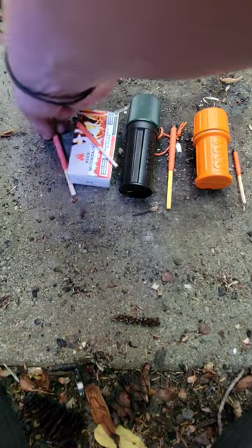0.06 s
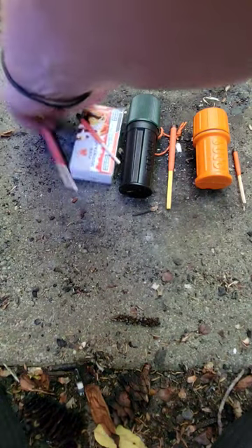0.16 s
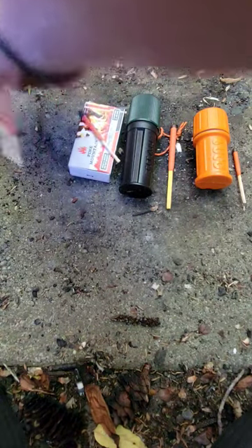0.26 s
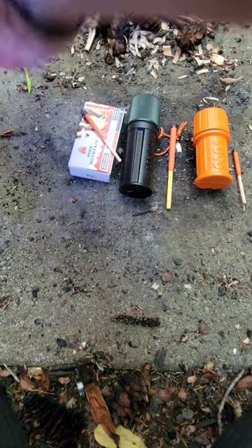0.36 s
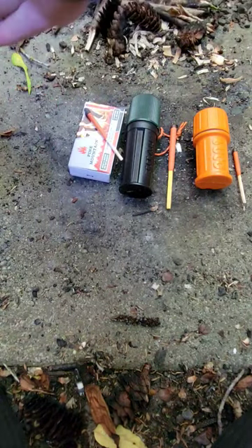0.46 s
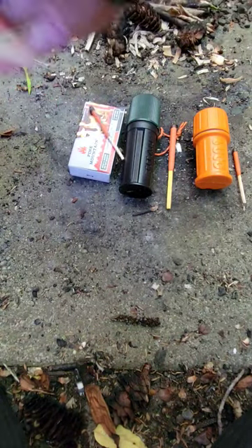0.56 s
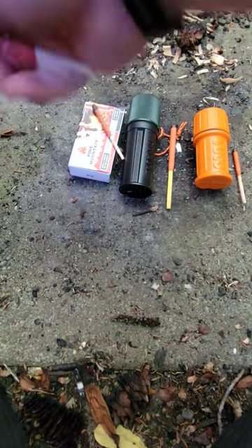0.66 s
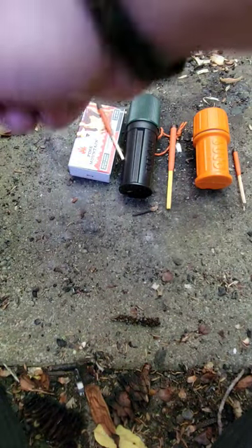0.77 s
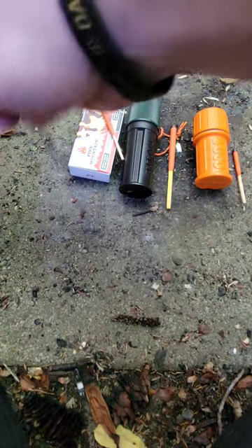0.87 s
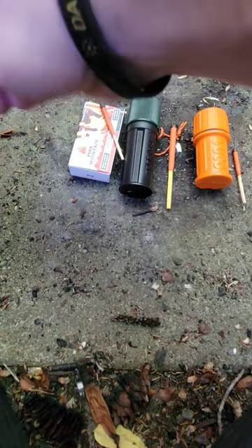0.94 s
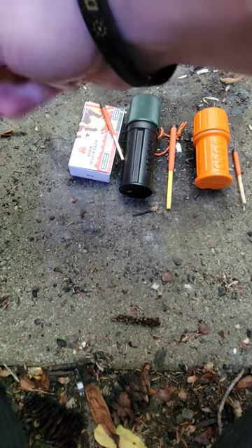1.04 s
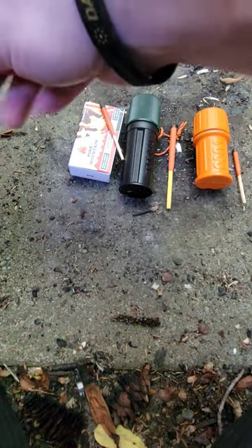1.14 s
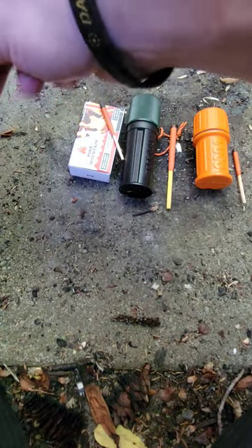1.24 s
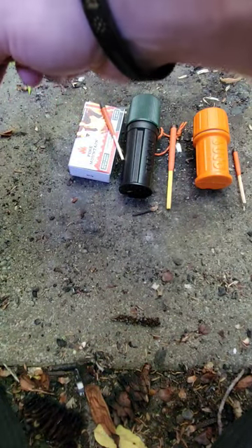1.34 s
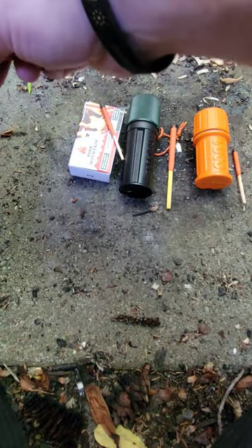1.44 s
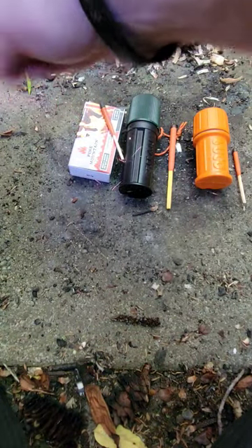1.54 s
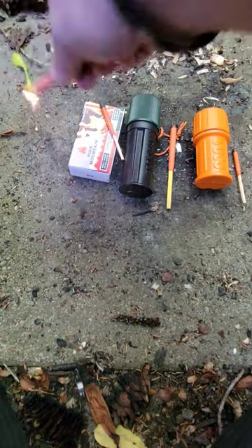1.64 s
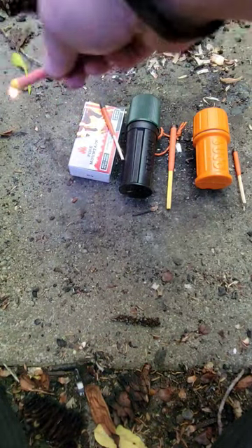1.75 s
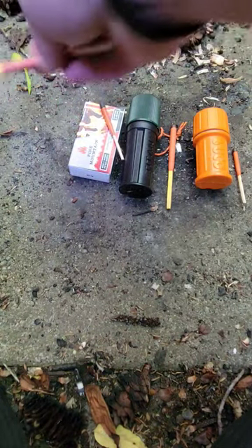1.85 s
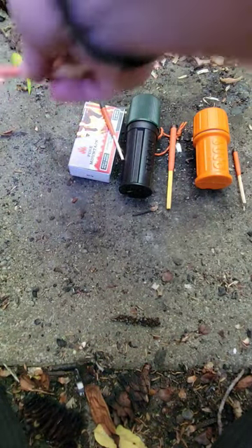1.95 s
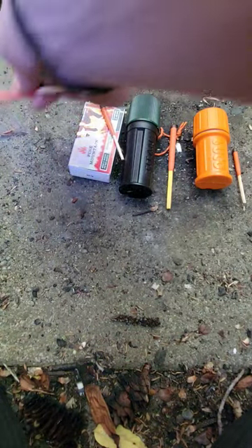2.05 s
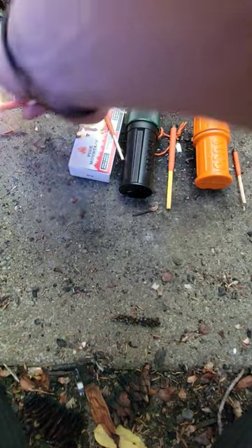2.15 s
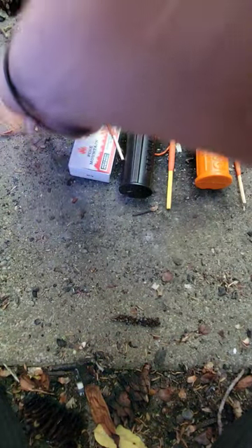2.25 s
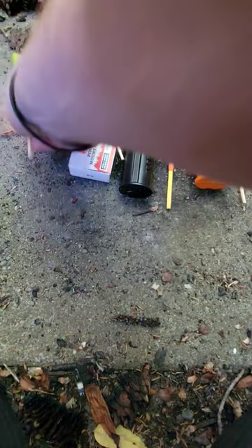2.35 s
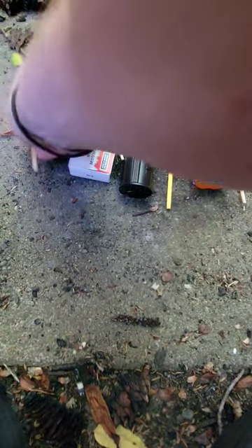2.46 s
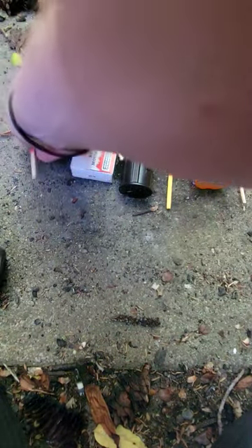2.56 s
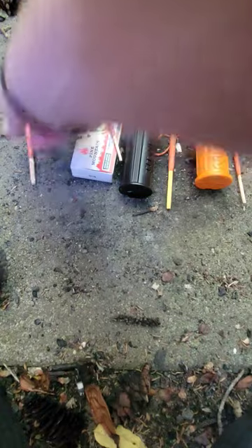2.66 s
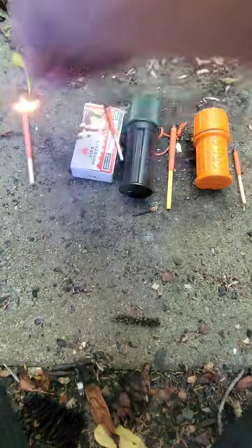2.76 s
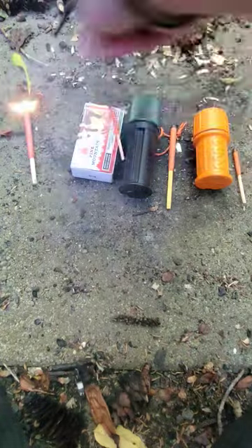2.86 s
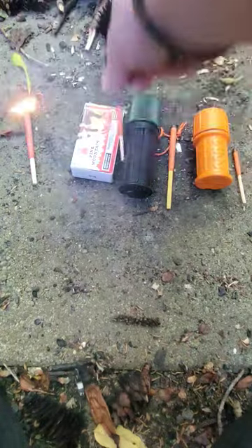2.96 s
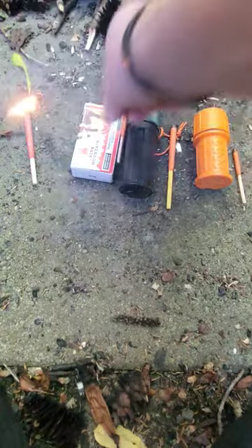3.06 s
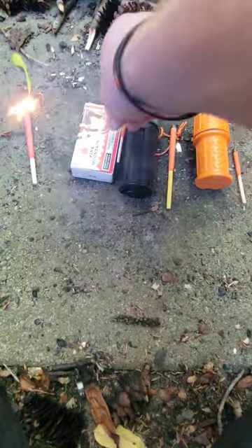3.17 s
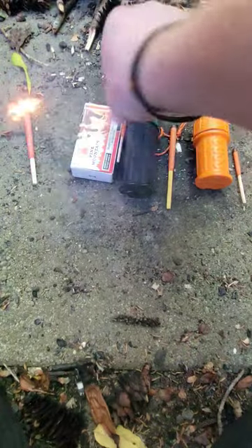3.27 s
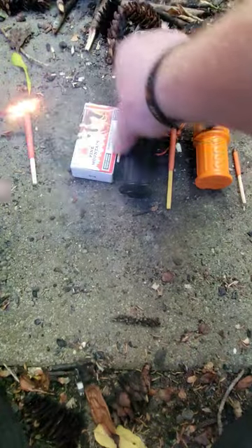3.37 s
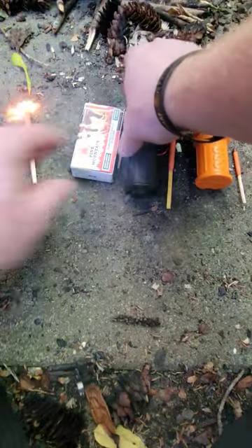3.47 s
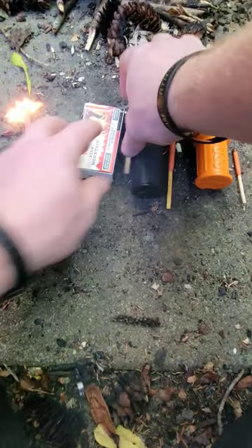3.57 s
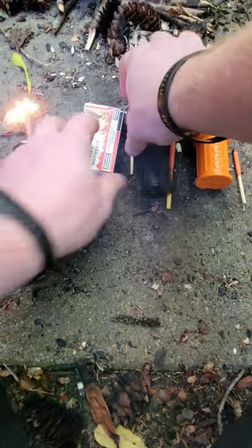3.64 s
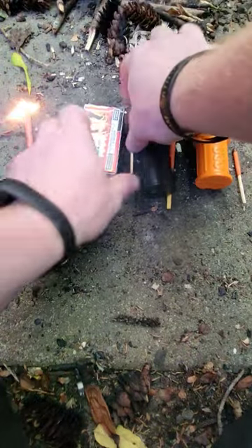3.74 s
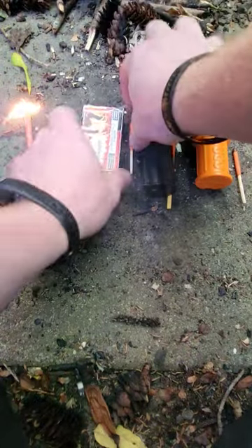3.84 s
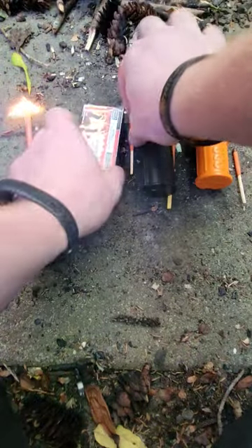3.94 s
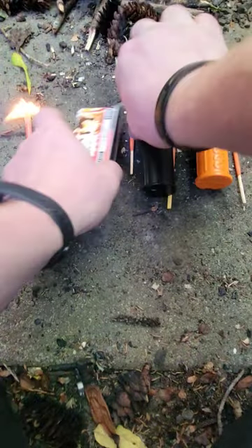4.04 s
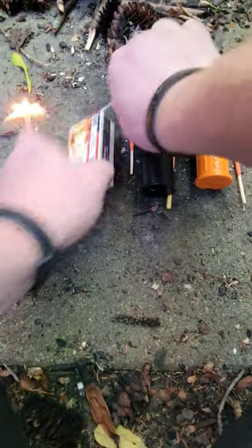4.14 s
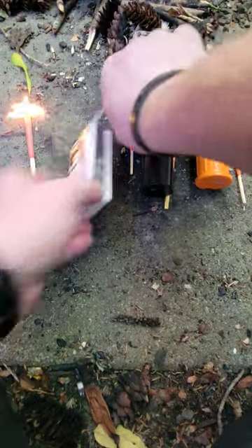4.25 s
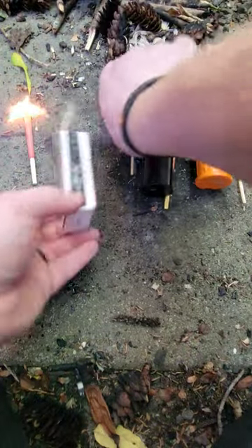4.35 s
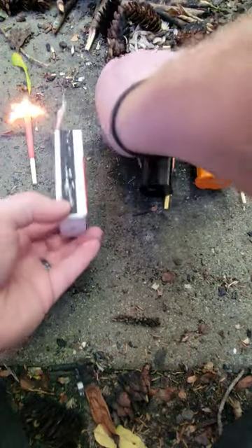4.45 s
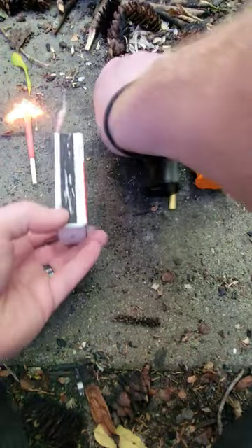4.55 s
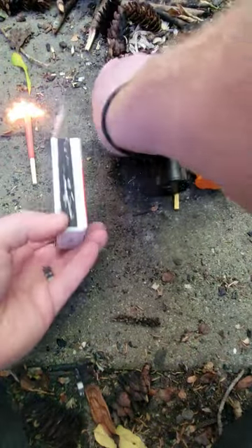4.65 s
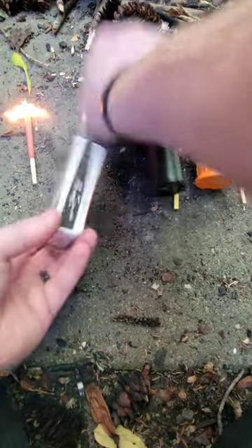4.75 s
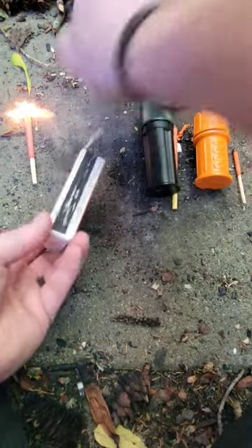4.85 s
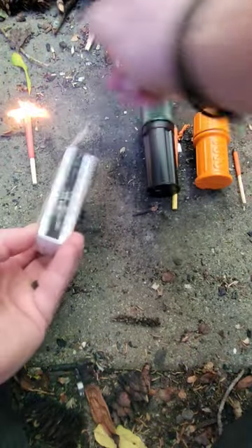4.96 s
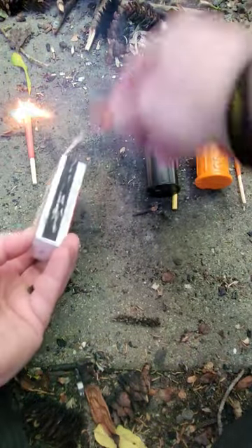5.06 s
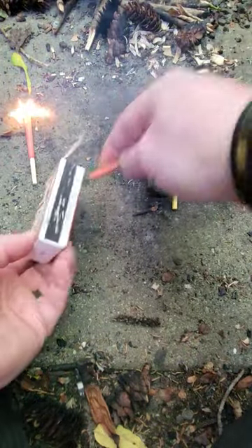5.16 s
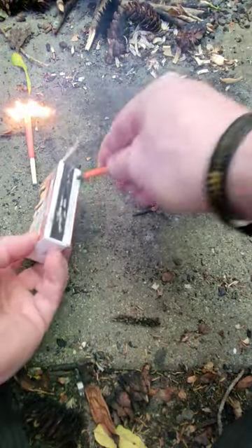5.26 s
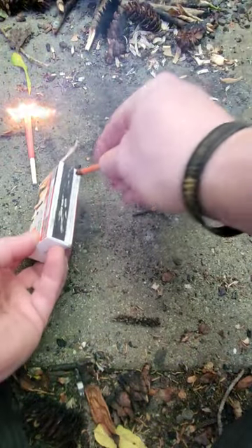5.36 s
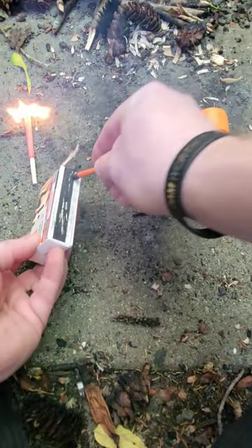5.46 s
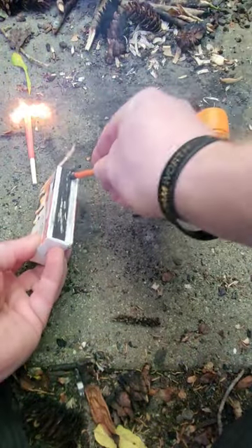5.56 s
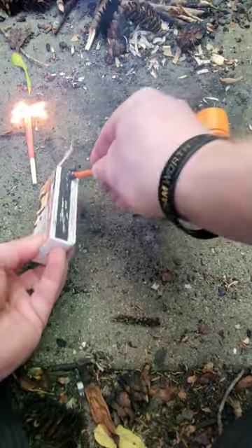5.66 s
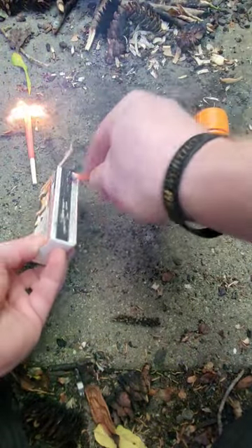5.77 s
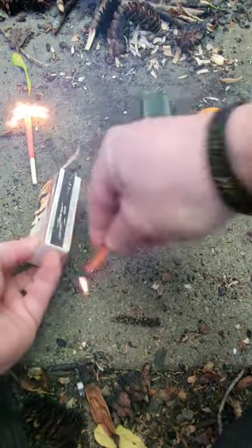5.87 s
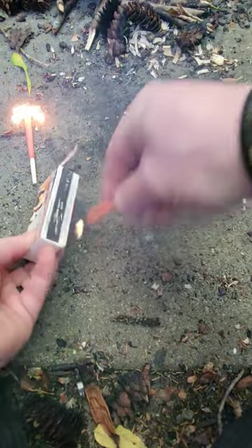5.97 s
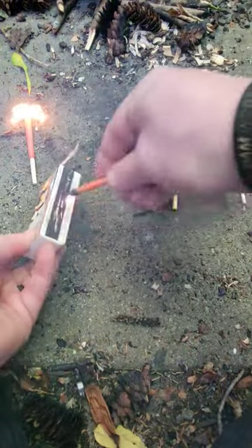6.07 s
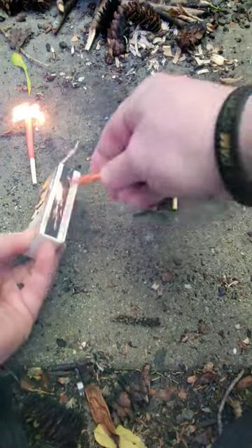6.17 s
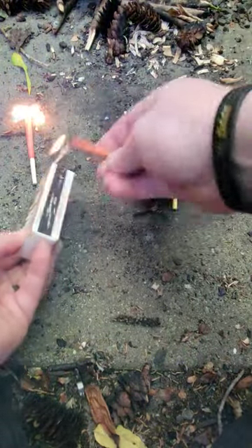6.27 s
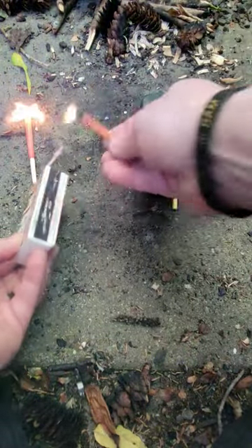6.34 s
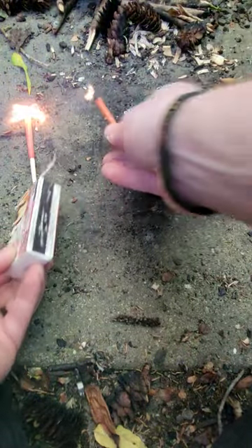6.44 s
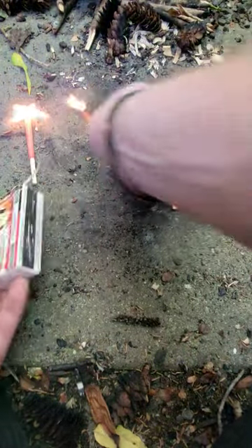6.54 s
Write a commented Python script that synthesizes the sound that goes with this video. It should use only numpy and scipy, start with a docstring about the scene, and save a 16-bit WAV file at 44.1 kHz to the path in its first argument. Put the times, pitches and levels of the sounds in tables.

```python
"""Over faint outdoor noise, hands knock and rub a cardboard box, match sticks and a plastic match tube.
A storm match then rasps on the strip in bites of snapping grains, catches, and hisses on as gas-jet noise,
its ground echo sweeping up as it is lowered to the concrete. More handling follows: gritty contacts through
resonances. A second match is scraped near the end and catches with a short rush. A two-port microphone
hears all with one port balance; close strikes and more scattered sounds differ in phase and likeness."""
import sys
import numpy as np
from scipy import signal
from scipy.fft import rfft, irfft
from scipy.io import wavfile
from scipy.ndimage import uniform_filter1d, map_coordinates

SR = 44100
rng = np.random.default_rng(int(sys.argv[2]) if len(sys.argv) > 2 else 0)


def to_wav(s):
    """Save 16-bit WAV."""
    ch = np.atleast_2d(s).T  # columns
    pcm = np.round(np.clip(ch, -1, 1) * 32767)  # PCM
    wavfile.write(sys.argv[1], SR, pcm.astype(np.int16))


N = 291360
TIME = np.arange(N) / SR
HZ = np.fft.rfftfreq(N, 1 / SR)

BITE_RISE_S, BITE_FALL_S = 0.00092, 0.0018
DRAG_RISE_S, DRAG_FALL_S = 0.0065, 0.006


def strike(bites, drag, spectrum, db, share):
    """The head drags over the strip and tears at it in bites, each a dense burst of snapping grains."""
    start_s, drag_db, stroke_s = drag
    pushes = [(s, level, BITE_RISE_S, length, BITE_FALL_S) for s, level, length in bites]
    pushes.append((start_s, drag_db, DRAG_RISE_S, stroke_s, DRAG_FALL_S))
    snaps = grains(per_s=10000, spread_db=5.0, share=share)
    return amp(db) * shaped(pressure(pushes) * snaps, spectrum)


# Head biting the strip. Each row: start in seconds, level in relative dB, length in seconds.
FIRST_BITES = [(1.6318, -15, 0.0089), (1.6447, -14.5, 0.0057), (1.6525, -13.5, 0.0023)]
SECOND_BITES = [(5.8643, -13, 0.0014), (5.8903, -22.5, 0.0089), (5.8956, -12.5, 0.00054)]
# Light drag along the strip. Each: start in seconds, level in relative dB, length in seconds.
FIRST_DRAG, SECOND_DRAG = (1.630, -26, 0.019), (5.860, -39.5, 0.044)
# Rasp colour. Each row: frequency in Hz, level in relative dB.
FIRST_RASP_COLOUR = [(30, -15), (120, -20.5), (200, 1), (300, -3.5), (420, -8), (800, -5), (1150, -1),
                     (1500, -1.5), (2100, -0.5), (3200, -5.5), (4600, -7.5), (7500, -8.5), (9500, -17),
                     (15000, -13.5)]
SECOND_RASP_COLOUR = [(40, -19), (150, -9), (330, -11.5), (480, -11), (700, -6.5), (1050, 2), (1450, -14.5),
                      (1900, -7.5), (2900, -6.5), (4000, -14), (5400, -3), (7300, -13), (9200, -18),
                      (12500, -11), (15000, -11.5)]


def strikes():
    """Both heads scraped over the strip, each with its catching rush."""
    grain_share = .55
    first = strike(FIRST_BITES, FIRST_DRAG, FIRST_RASP_COLOUR, db=0.5, share=grain_share)
    second = strike(SECOND_BITES, SECOND_DRAG, SECOND_RASP_COLOUR, db=3.0, share=grain_share)
    return first + second + catches()


# Heads catching. Each row: start in seconds, level in dB.
CATCH_TIMES = [(1.657, -30.5), (5.902, -32)]
CATCH_RISE_S, CATCH_HOLD_S, CATCH_FALL_S = 0.0024, 0.0069, 0.0095
# Rush colour. Each row: frequency in Hz, level in relative dB.
CATCH_COLOUR = [(60, -9), (200, 3.5), (600, -3), (1100, -2), (1700, -12.5), (2700, -4), (4500, -13),
                (7500, -7), (10000, -15), (15000, -16)]


def catches():
    """Each head catches fire with a crackling rush that dies quickly."""
    rush = pressure([(s, db, CATCH_RISE_S, CATCH_HOLD_S, CATCH_FALL_S) for s, db in CATCH_TIMES])
    return shaped(rush * grains(per_s=4000, spread_db=2.0, share=0.8), CATCH_COLOUR)


# Gas pushed out by a catching head.
# Each row: start in seconds, level in relative dB, swing rate in Hz, time to the crest in seconds.
GAS_PUFFS = [(1.639, -24.5, 62, 0.0092), (1.637, -26.5, 178, 0.008), (1.656, -25, 140, 0.0018)]


def puffs():
    """The sudden gas gives a few low swings of pressure."""
    out = np.zeros(N)
    for s, db, hz, crest_s in GAS_PUFFS:
        t = np.maximum(TIME - s, 0)
        age = np.minimum(t / crest_s, 30)
        swell = age * np.exp(1 - age)
        out += amp(db) * np.sin(2 * np.pi * hz * t) * swell
    return signal.sosfilt(signal.butter(1, 40, "high", fs=SR, output="sos"), out)


# Hiss of the fresh flare and of the even burn. Each row: frequency in Hz, level in relative dB.
FLARE_COLOUR = [(300, -8), (1000, -12), (1800, -1), (2800, -0.5), (4500, -1), (7500, -1.5), (9500, -6),
                (13000, -4), (15500, -5)]
BURN_COLOUR = [(150, -5), (450, -5), (750, 0), (1250, -9), (1550, -9.5), (3200, -10), (5400, -15),
               (7700, -16), (9500, -23.5), (13500, -18), (15500, -19)]
# Lulls in the hiss. Each row: centre in seconds, depth in dB, half width in seconds.
HISS_LULLS = [(2.35, 3.5, 0.14), (3.2, 6.5, 0.29), (3.85, 2, 0.22), (5.78, 2, .08)]
LIT_S, FLARE_RISE_S, SPENT_S, FLARE_FALL_S = 1.64, 0.078, 3.04, .06
FLARE_FADE_DB_PER_S, FIZZ_FADE_DB_PER_S = 10, 3.5  # the fizz fade adds to the flare fade
BURN_FROM_S, BURN_RISE_S = 1.87, 1  # the coated stick takes over


def flame(flare_db=-46, burn_db=-53.0, fizz_db=1.0, treble_lull=0.088):
    """Hissing gas jets: a bright flare that fades, then an even burn; in a lull the treble drops most."""
    age_s = np.maximum(TIME - LIT_S, 0)
    jets = grains(per_s=1800, spread_db=4, share=.5)
    lull_db = sum(depth * np.exp(-((TIME - s) / width) ** 2) for s, depth, width in HISS_LULLS)
    spent = np.exp(-np.maximum(TIME - SPENT_S, 0) / FLARE_FALL_S)
    alight = np.minimum(age_s / FLARE_RISE_S, 1) * spent
    flare_hiss = treble(shaped(jets, FLARE_COLOUR), fizz_db - FIZZ_FADE_DB_PER_S * age_s)
    flare = alight * amp(flare_db - FLARE_FADE_DB_PER_S * age_s) * flare_hiss
    burn_rise = np.clip((TIME - BURN_FROM_S) / BURN_RISE_S, 0, 1)
    burn = burn_rise * amp(burn_db) * shaped(jets, BURN_COLOUR)
    return ground_echo(amp(-lull_db) * treble(flare + burn, -treble_lull * lull_db))


def treble(x, db):
    """Raises or lowers the fizz above 8 kHz."""
    fizz = irfft(rfft(x) * np.clip((HZ - 8000) / 1000, 0, 1), N)
    return x + (amp(db) - 1) * fizz


START_HEIGHT_M, REST_HEIGHT_M, LOWER_S = .058, .01, .93
ECHO_GAIN, ECHO_FADE_S = .31, .35


def ground_echo(gas):
    """The echo off the concrete sweeps upward as the match is lowered, slowly at first, and fades out."""
    age_s = np.maximum(TIME - LIT_S, 0)
    height_m = np.maximum(START_HEIGHT_M * (1 - (age_s / LOWER_S) ** 2), REST_HEIGHT_M)
    echo = ECHO_GAIN * np.clip((LOWER_S - age_s) / ECHO_FADE_S, 0, 1)
    delay_s = 2 * height_m / 343  # there and back at the speed of sound in m/s
    return gas + echo * map_coordinates(gas, [(TIME - delay_s) * SR], order=3)


def sputter(pair, flutter_db=1.4, patch_db=2.5):
    """The flame flutters as a whole, while single jets come and go in patches of pitch."""
    z = signal.stft(pair, nperseg=512)[2]
    patches = rng.standard_normal(z.shape[1:])
    patches = uniform_filter1d(patches, size=5, axis=0)  # across pitch
    patches = evened(uniform_filter1d(patches, size=10, axis=1))  # along time
    patchy = signal.istft(z * amp(patch_db * patches), nperseg=512)[1][:, :N]
    return patchy * amp(flutter_db * drift(per_s=38))


# Match sticks and plastic tube, cardboard box, then grit and sparks.
# Each row: start in seconds, level in relative dB, lowest resonance in Hz.
STICK_HITS = [(0.2375, -34.5, 2530), (0.2515, -28.5, 2026), (0.5648, -32.5, 2460), (0.577, -36.5, 2480),
              (0.839, -44, 2000), (2.5704, -25, 2555), (3.0972, -26, 2470), (3.1125, -31, 2500),
              (3.1248, -21.5, 2440), (3.1528, -30, 2700), (3.163, -34, 2460), (5.6265, -39.5, 2600)]
BOX_HITS = [(0.103, -37.5, 1160), (0.2375, -45, 1400), (0.268, -39.5, 1270), (0.839, -37.5, 1580),
            (1.194, -43.5, 1460), (3.617, -45, 1310), (4.186, -38.5, 1230), (5.265, -48, 1100),
            (5.514, -44, 1070), (5.535, -46.5, 1130), (5.6265, -38.5, 1100)]
GRIT_HITS = [(0.0418, -53.5, 7960), (0.8546, -48, 2770), (0.9612, -45.5, 2580), (1.0054, -43, 3510),
             (2.6805, -39, 7800), (2.74, -50, 4550), (2.9584, -37.5, 3000), (3.053, -35.5, 5570),
             (3.0975, -26.5, 2600), (3.6173, -41.5, 4020), (3.684, -46, 2720), (4.558, -42, 4400),
             (4.614, -47, 4650), (4.6683, -45.5, 4600), (6.0172, -45, 2380)]
# Resonances of each. Each row: frequency in Hz before the shift, width in Hz, level in relative dB.
STICK_RESONANCES = [(2500, 130, 1), (3010, 240, -8), (4900, 180, -7), (5360, 170, -5), (6550, 200, -10),
                    (7400, 160, -9)]
BOX_RESONANCES = [(1240, 280, 6.5), (1750, 150, -19), (2250, 140, -22), (2990, 170, -31), (4530, 200, -15)]
GRIT_RESONANCES = [(5040, 170, 4), (7600, 1700, -11)]


def hands():
    """All the small handling sounds: rubs, and knocks of sticks, box and grit."""
    sticks = knocks(STICK_HITS, STICK_RESONANCES, db=0.0, contact_db=-15.5, decay_s=0.0028, bright_db=-2.5)
    box = knocks(BOX_HITS, BOX_RESONANCES, db=7.5, contact_db=-13.5, decay_s=0.0025, bright_db=-1.4)
    ticks = knocks(GRIT_HITS, GRIT_RESONANCES, db=2.0, contact_db=-10.5, decay_s=0.0028, bright_db=5.0)
    return rubs(db=4.0) + sticks + box + ticks


# Dry contact noise. Each row: frequency in Hz, level in relative dB.
CONTACT_COLOUR = [(100, -42), (600, -21), (1200, -5), (1700, -3), (7000, -6), (9500, -12), (15000, -15.5)]
# Harder is brighter: dB an octave for each dB of row level above the middling one.
BRIGHTEN, MIDDLING_DB = 0.11, -34.5


def knocks(rows, modes, db, contact_db, decay_s, bright_db, rise_s=.0008, blow=1.8):
    """Each knock is a brief gritty contact; where it lands shifts the resonances of the thing touched."""
    out, t = np.zeros(N), np.arange(4096) / SR
    rattle = .07 * np.exp(-t / .016)
    envelope = (np.exp(-t / max(decay_s, .0004)) + rattle) * np.minimum(t / rise_s, 1)
    for (s, level_db, ring_hz), grit in zip(rows, rng.standard_normal((len(rows), len(t)))):
        tilt_db = bright_db + BRIGHTEN * (level_db - MIDDLING_DB)  # per octave
        shift = ring_hz / modes[0][0]

        def body(hz):
            """Gain of the touched thing: resonances plus dry contact, tilted by hardness."""
            ring = sum(amp(level) ** 2 / (1 + (2 * (hz - f * shift) / width) ** 2)
                       for f, width, level in modes)
            contact = amp(contact_db + read(CONTACT_COLOUR, hz)) ** 2
            bare = np.sqrt(ring + contact) * hz / (hz + 400)
            return bare * amp(tilt_db * np.log2(np.maximum(hz, 500) / 3000))

        push = grit * envelope
        push[round(rise_s * SR)] += blow  # the clean impact inside the grit
        part = out[round(s * SR):][:len(t)]
        part += amp(level_db + db) * colour(push, body)[:len(part)]
    return out


# Fingers and sticks sliding. Each row: start in seconds, level in relative dB, length in seconds.
RUB_STROKES = [(0.082, -57.5, 0.024), (0.183, -61.5, 0.053), (.255, -54.5, 0.031), (.39, -65.5, .05),
               (0.65, -61.5, 0.11), (.92, -69, 0.35), (1.007, -53, 0.015), (2.585, -52, 0.015),
               (2.893, -55, 0.08), (3.02, -56, 0.086), (3.495, -56.5, 0.09), (4.58, -59.5, .08),
               (4.846, -55.5, 0.039), (5.021, -50.5, 0.032)]
# Slide colour. Each row: frequency in Hz, level in relative dB.
SLIDE_COLOUR = [(200, -36), (900, 6), (1600, -2), (2900, 3.5), (4200, -1.5), (7500, -1.5), (9500, -9.5),
                (14000, -4.5)]
RUB_RISE, RUB_FALL = 0.26, 0.4  # time constants as shares of the length


def rubs(db):
    """Skin and wood dragging over card, plastic and concrete."""
    pushes = [(s, level, RUB_RISE * length, length, RUB_FALL * length) for s, level, length in RUB_STROKES]
    friction = pressure(pushes) * grains(per_s=2000, spread_db=4.5, share=0.74)
    return amp(db) * shaped(friction, SLIDE_COLOUR)


def bump(start_s=.438, db=-47.5, hz=480, decay_s=0.0096):
    """One soft, dull bump of the hand."""
    thud = pressure([(start_s, db, .002, .003, decay_s)]) * rng.standard_normal(N)
    return colour(thud, lambda f: 1 / (1 + ((f - hz) / 220) ** 2))


def clutter(pair, db, spread_s=.005, count=7):
    """A few hard reflections from the box, tubes and hands, different at each port."""
    size = 1024
    at = ((0.083 + rng.random((2, count))) * spread_s * SR).astype(int)
    at = np.clip(at, 1, size - 1)
    taps = np.zeros((2, size))
    np.put_along_axis(taps, at, amp(db) / np.sqrt(count) * rng.choice([-1, 1], at.shape), 1)
    # small things reflect only the short waves
    taps = signal.sosfilt(signal.butter(1, 700, "high", fs=SR, output="sos"), taps)
    return pair + signal.oaconvolve(pair, taps, axes=1)[:, :N]


def yard(x, db=-21, t60_s=0.12, dull_hz=4200):
    """A faint, dull return from the surroundings."""
    t = np.arange(SR // 2) / SR
    onset = np.clip((t - .006) / 0.0065, 0, 1)
    taps = rng.standard_normal((2, len(t))) * amp(-60 * t / t60_s) * onset
    band = signal.butter(2, [300, min(dull_hz, SR / 3)], "band", fs=SR, output="sos")
    taps = signal.sosfilt(band, taps)
    return amp(db) * signal.oaconvolve(x[None], taps / np.linalg.norm(taps[0]), axes=1)[:, :N]


# Outdoor noise. Each row: frequency in Hz, level in relative dB.
AIR_COLOUR = [(20, -19), (40, -2.5), (60, 3), (100, -1), (150, -8.5), (300, -13), (470, -17), (750, -17.5),
              (1050, -17), (1500, -21.5), (3000, -29), (7500, -37), (9500, -47), (15000, -47)]
# Distant rumble, used relative to its mean. Each row: time in seconds, level in dB.
RUMBLE_SWELL = [(0, -50.5), (1.55, -49), (2.1, -53.5), (4.1, -53.5), (5.3, -50), (6.6, -50)]
AIR_RMS_DB = -49


def air():
    """Distant outdoor noise; its rumble swells slowly and is nearly alike at both ports."""
    noise = rfft(rng.standard_normal((2, N))) * amp(read(AIR_COLOUR, HZ)) * HZ / (HZ + 10)
    bass = 1 / (1 + (HZ / 160) ** 4)
    swell_s, level_db = np.transpose(RUMBLE_SWELL)
    swell_db = np.interp(TIME, swell_s, level_db)
    rumble = irfft(noise * bass, N) * amp(swell_db - swell_db.mean())
    a, b = irfft(noise * (1 - bass), N) + rumble
    return amp(AIR_RMS_DB) * evened(ports(a, b, SCATTERED_LIKENESS, GROUND_PHASE, lead_s=0.00034))


# Port balance. Each row: frequency in Hz, left minus right in dB.
BALANCE = [(60, -0.8), (200, -4), (380, -6.5), (620, 5), (1050, -1.5), (1500, 0.5), (2200, -1.5),
           (4000, -1), (7000, 0.5), (15000, 2.5)]


def ports(x, other, likeness, leads, lead_s):
    """Two ports differ in phase and level; the less alike, the more the right hears of other paths."""
    beyond_hz = np.maximum(HZ - leads[-1][0], 0)
    phase = read(leads, HZ) + 2 * np.pi * lead_s * beyond_hz
    lean = amp(read(BALANCE, HZ) / 2)
    turn = lean * np.exp(.5j * phase)
    same = np.clip(read(likeness, HZ), 0, 1)
    left = rfft(x)
    right = same * left + np.sqrt(1 - same ** 2) * rfft(other)
    pair = np.array([left * turn, right / turn])
    return irfft(pair / np.sqrt((lean ** 2 + lean ** -2) / 2), N)


def pressure(rows):
    """Contact strength: each push swells, holds and dies away; their powers add."""
    power = np.zeros(N)
    for s, db, rise_s, hold_s, fall_s in rows:
        before = np.maximum(s - TIME, 0) / rise_s
        after = np.maximum(TIME - s - hold_s, 0) / fall_s
        power += (amp(db) * np.exp(-np.minimum(before + after, 20))) ** 2
    return np.sqrt(power)


def grains(per_s, spread_db, share):
    """Tiny fractures of uneven size over a smooth hiss, rms one; share is the fractures' part of the power."""
    sizes = amp(spread_db * np.minimum(rng.exponential(1, N), 4)) * rng.choice([-1, 1], N)
    cracks = evened(sizes * (rng.random(N) < per_s / SR))
    share = np.clip(share, 0, 1)
    return np.sqrt(share) * cracks + np.sqrt(1 - share) * rng.standard_normal(N)


def drift(per_s):
    """Slow chance: random knots, per_s of them a second, joined by lines."""
    knots = rng.standard_normal(8192)
    return np.interp(TIME * per_s, np.arange(len(knots)), knots)


def colour(x, gain):
    """Causal minimum-phase filter of unit power; gain is a function of frequency."""
    size = 4096
    g = np.maximum(evened(gain(abs(np.fft.fftfreq(size, 1 / SR)))), 1e-5)
    taps = np.fft.ifft(np.exp(np.conj(signal.hilbert(np.log(g))))).real
    return signal.oaconvolve(x, taps[:size // 2])[:len(x)]


def shaped(x, spectrum):
    """Gives a white signal the colour of a spectrum table."""
    return colour(x, lambda hz: amp(read(spectrum, hz)))


def read(points, hz):
    """Reads a table on a logarithmic frequency axis."""
    f, value = np.transpose(points)
    return np.interp(np.log(hz + 1), np.log(f + 1), value)


def evened(x):
    """Scales to an rms of one."""
    return x / np.sqrt(np.mean(abs(x) ** 2) + 1e-20)


def amp(db):
    """Decibels to gain."""
    return 10 ** (np.asarray(db) / 20)


# Phase for sound from the ground, then from the box close by.
# Each row: frequency in Hz, left lead in radians.
GROUND_PHASE = [(20, 0), (250, .1), (370, 1), (460, 3), (600, 5), (900, 7.7), (1150, 8.5), (1950, 8.6),
                (3000, 11.4), (4000, 12)]
BOX_PHASE = [(20, 0), (250, .1), (370, 1), (460, 3), (600, 5), (900, 8), (1200, 8.8), (1600, 8.2),
             (2000, 9), (4000, 10.5)]
# Likeness at the ports of scattered, then of close sound. Each row: frequency in Hz, likeness 0 to 1.
SCATTERED_LIKENESS = [(60, 0.94), (130, 0.99), (300, 0.74), (700, 0.52), (1400, 0.87), (3000, 0.085),
                      (6000, 0.097), (15000, 0.06)]
CLOSE_LIKENESS = [(100, .98), (500, .96), (1200, .88), (2000, .72), (3000, .62), (6000, .5), (15000, .4)]


def scene():
    """Strikes, flame and handling in the open air."""
    scrape, handling = strikes(), hands()
    # a second draw of each source stands for the other paths by which it reaches the right port
    struck = ports(scrape + puffs() + bump(), strikes(), CLOSE_LIKENESS, BOX_PHASE, lead_s=0.000284)
    # things on the ground are half hidden by the hands and arrive more scattered
    handled = ports(handling, hands(), SCATTERED_LIKENESS, GROUND_PHASE, lead_s=0.00026)
    burning = sputter(ports(flame(), flame(), SCATTERED_LIKENESS, GROUND_PHASE, lead_s=0.000323))
    near = clutter(struck + handled, db=-11) + clutter(burning, db=-8)
    return near + yard(scrape + handling) + air()


OVERLOAD, EDGE_HZ = .85, 15700  # ceiling as a share of full scale; band limit


def record(dry):
    """The recorder rounds off the very highest peaks; then its band limit."""
    rounded = dry / (1 + (dry / OVERLOAD) ** 4) ** .25
    lowpass = signal.firwin(255, EDGE_HZ, window=("kaiser", 9), fs=SR)
    return signal.oaconvolve(rounded, lowpass[None], "same")


dry = scene()
out = record(dry)
to_wav(out)
```